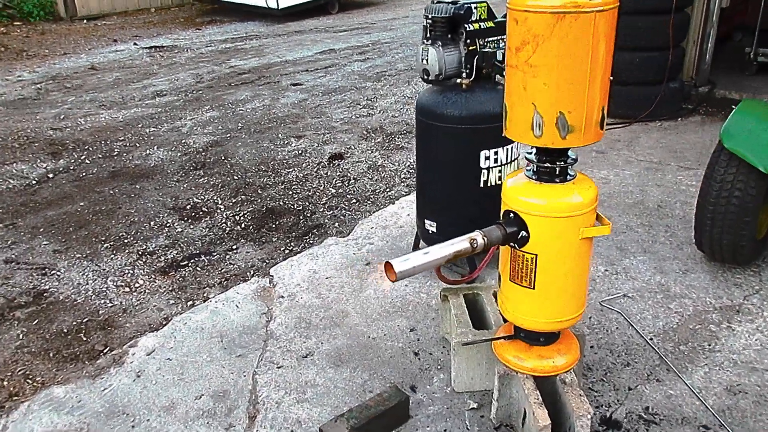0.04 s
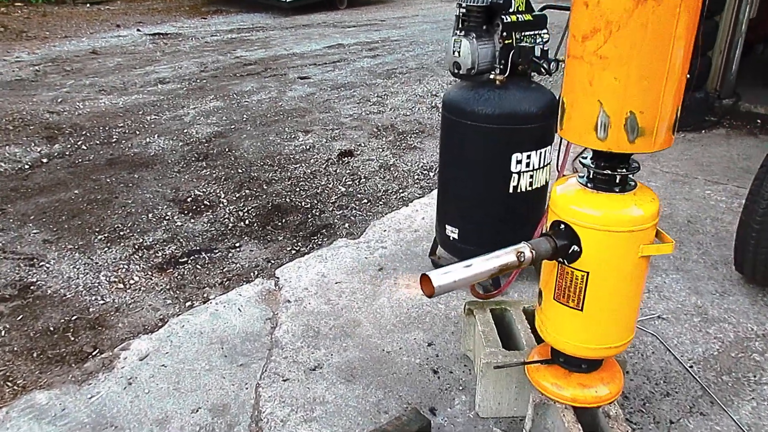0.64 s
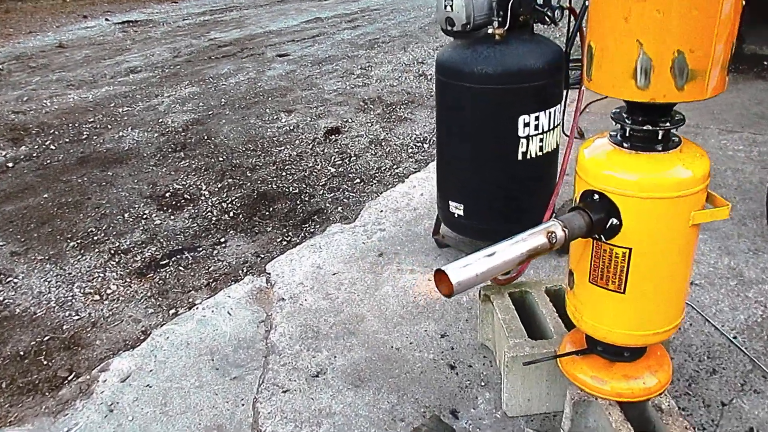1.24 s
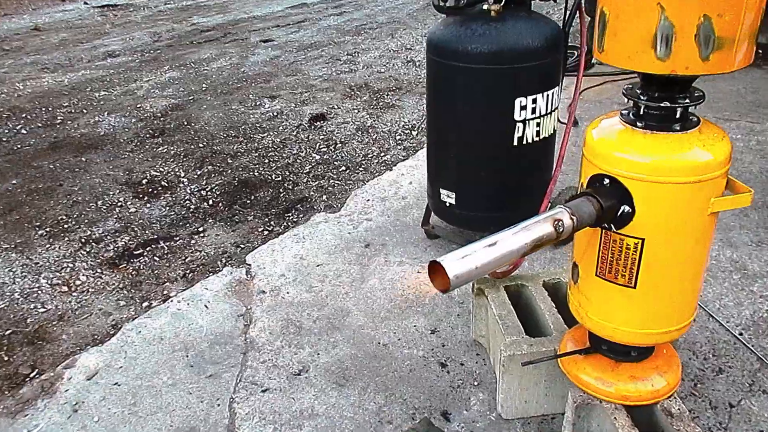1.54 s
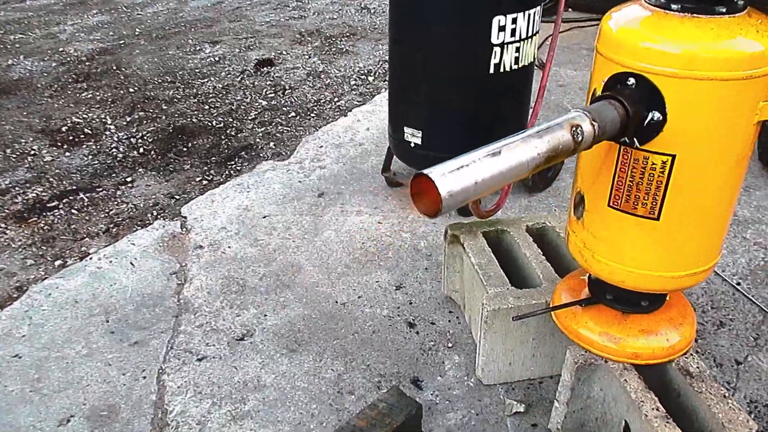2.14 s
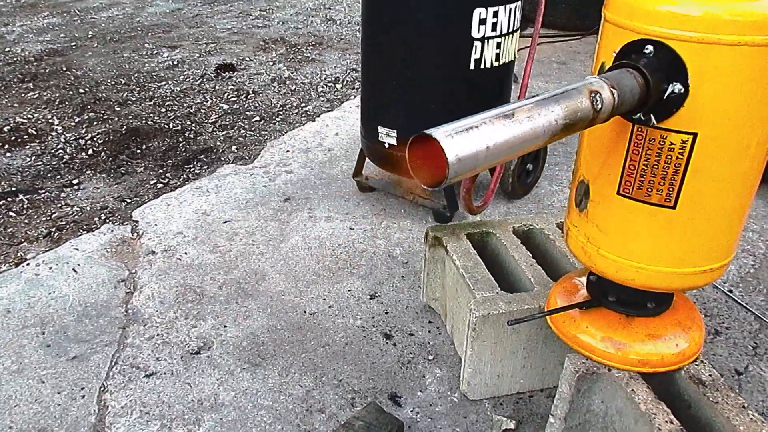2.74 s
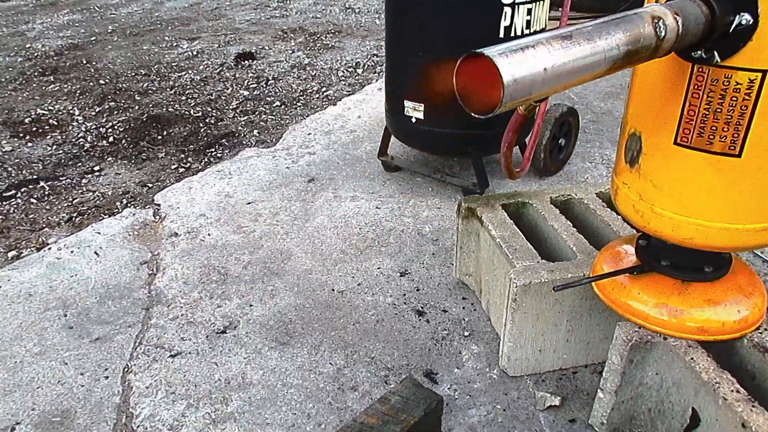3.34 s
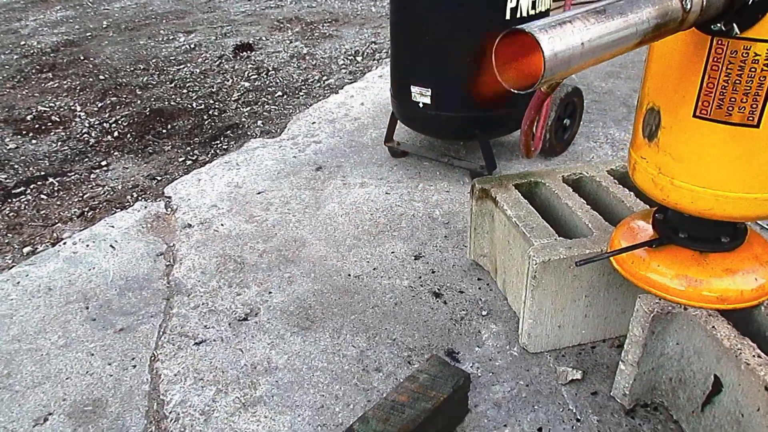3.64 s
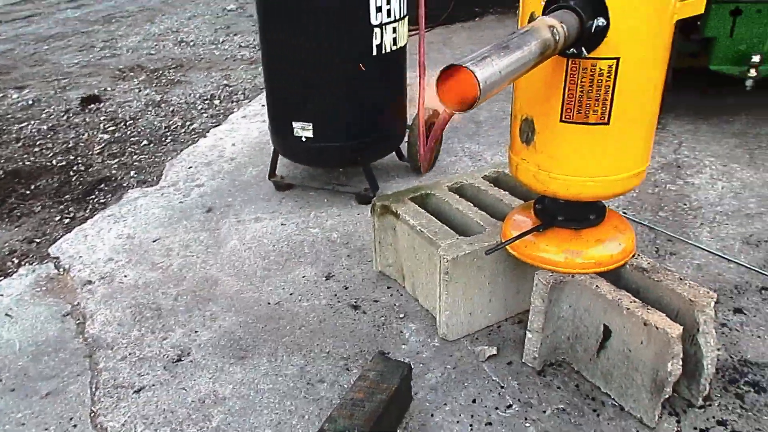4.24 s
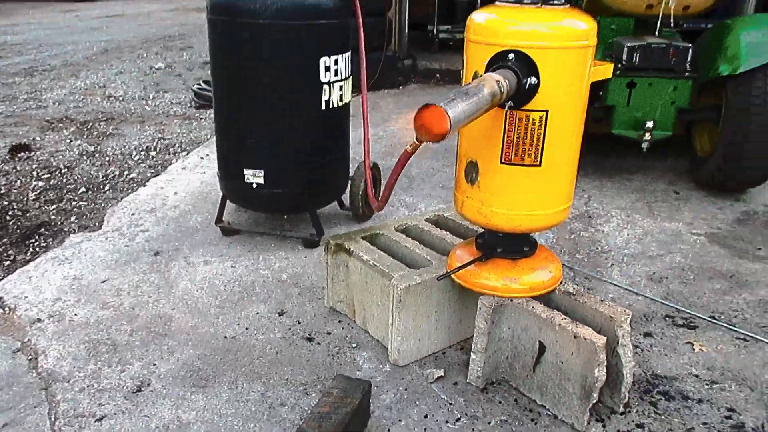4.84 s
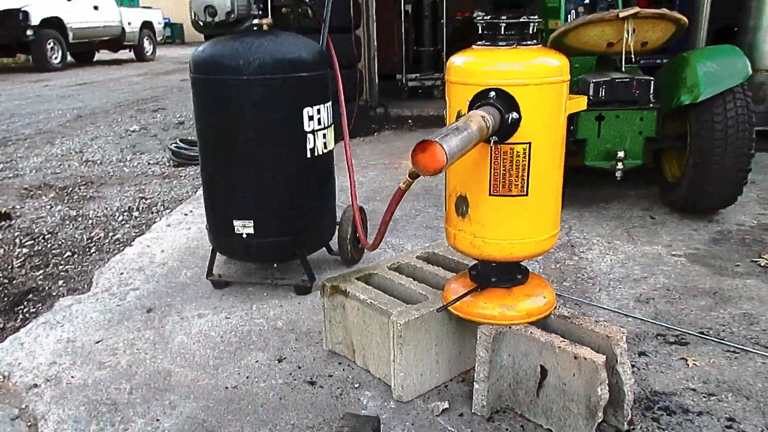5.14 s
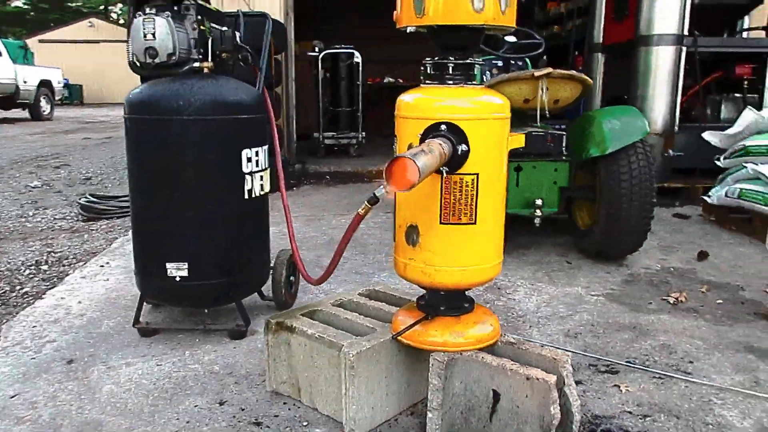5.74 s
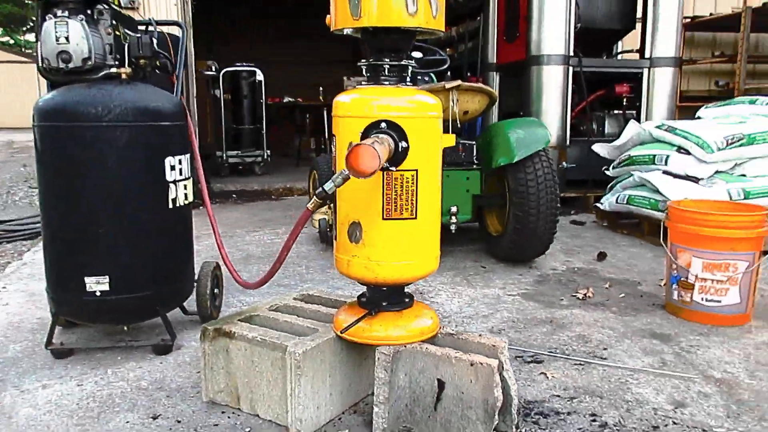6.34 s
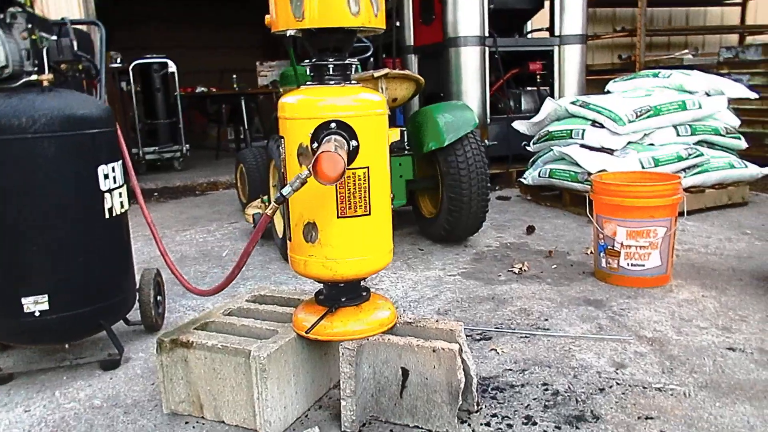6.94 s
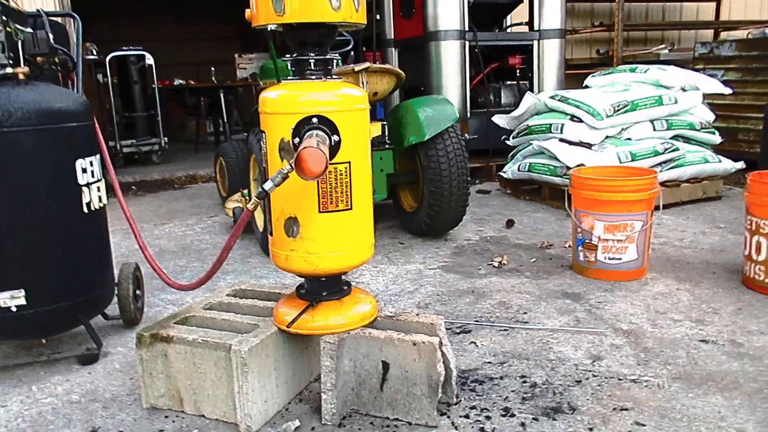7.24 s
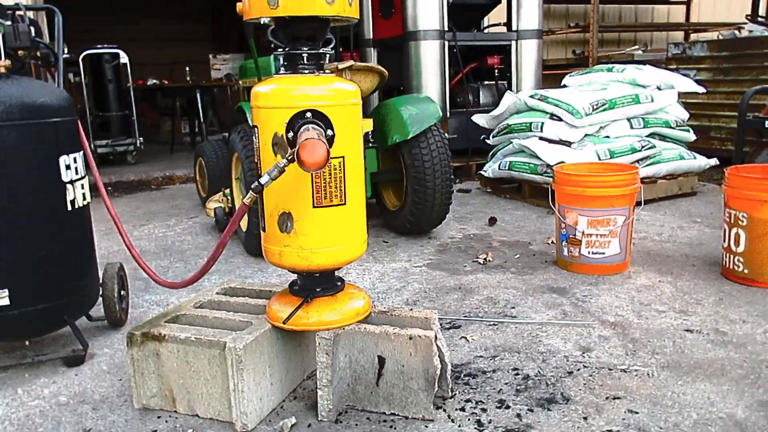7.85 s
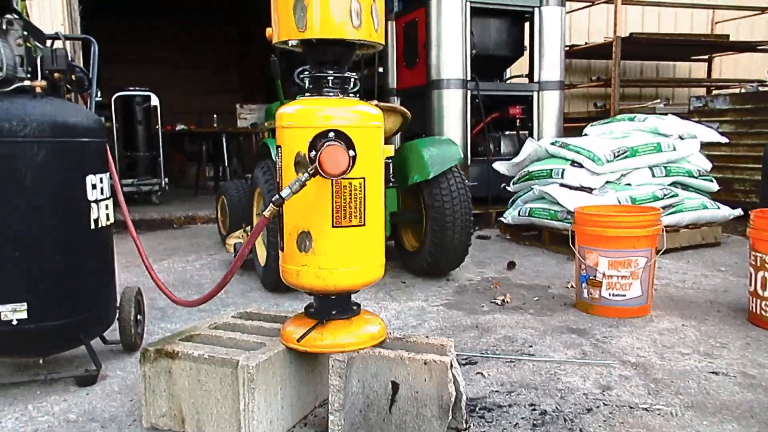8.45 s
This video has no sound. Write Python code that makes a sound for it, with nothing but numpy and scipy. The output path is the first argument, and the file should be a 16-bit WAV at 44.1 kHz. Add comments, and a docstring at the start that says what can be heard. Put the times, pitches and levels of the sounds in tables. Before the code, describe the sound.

Outdoors, a gas flame roars continuously from a steel pipe, with a hollow, fluttering ring. Beside it an air compressor runs with a very fast metallic clatter, a high ringing and hiss. Midway the microphone moves round to the pipe's mouth: the hollow tone fades into a louder roar, and the compressor's rattle, hum and thin whine come forward. Light wind rumbles on the microphone, with a soft thump near the end.

```python
"""Outdoors, a gasifier's flame roars and rings its steel flare pipe while an air compressor hammers
beside it, each piston stroke snapping the valves and ringing the pump head. Light wind touches the mic.
From 3.5 to 6.3 s the mic walks round to the pipe's mouth: the lowest pipe resonance sinks into the
roar, and the compressor's clatter and hum come forward. The roar peaks around 7 s and eases as the
mic backs away; a gust thumps it just after 8 s."""
import sys
import numpy as np
from scipy import signal
from scipy.fft import rfft, irfft, next_fast_len
from scipy.io import wavfile
from scipy.ndimage import uniform_filter1d, map_coordinates

SR = 44100
rng = np.random.default_rng(int(sys.argv[2]) if len(sys.argv) > 2 else 0)


def generate_wav(sig):
    """Save sig (samples, or channels by samples) to the path in sys.argv[1] as 16-bit PCM at SR."""
    pcm = np.round(np.clip(np.atleast_2d(sig).T, -1, 1) * 32767).astype(np.int16)
    wavfile.write(sys.argv[1], SR, pcm)


N = 383669

# flame faders: t/s, roar level/dB, upper resonance level/dB
FLAME_FADERS = [(0.0, -29.0, -36.0), (1.15, -29.5, -38.5), (2.3, -26, -32.0), (2.6, -27.5, -35),
                (3.65, -24.5, -33.5), (4.4, -28, -34.5), (5.4, -25, -31), (6.15, -24, -35.5),
                (6.45, -20.5, -30.5), (7.0, -20.5, -29.5), (7.4, -23, -29.0), (7.9, -22, -31.5),
                (8.4, -22, -33.5), (8.7, -24, -40)]
# brief flares (+) and falters (-): t/s, length/s, gain/dB
FLAME_SURGES = [(.14, 0.046, 2), (.72, .06, -8), (1.0, 0.023, 6.5), (1.24, 0.056, -8), (1.69, .04, -3),
                (1.728, 0.021, 10), (2.18, .03, 5.5), (3.68, 0.026, 7), (3.95, 0.036, 3.5),
                (4.18, 0.056, -5), (4.235, .03, 5.5), (4.55, 0.053, 6.5), (6.41, 0.034, 5.5),
                (7.0, 0.028, 3)]
# roar EQ beside the pipe: f/Hz, level/dB
ROAR_SIDE_EQ = [(30, -21), (100, -18.5), (200, -8), (330, 0.5), (480, -0.5), (620, 0.5), (800, -17.5),
                (950, -14), (1400, -11.5), (1700, -14.5), (4000, -23.5), (9000, -27)]
# roar EQ facing its mouth: f/Hz, level/dB
ROAR_FRONT_EQ = [(30, -42), (100, -18), (220, -11), (350, -5.5), (520, 4.5), (620, -0.5), (760, -5.5),
                 (880, -8), (1100, -17.5), (1380, -11.5), (1700, -17), (4000, -19.5), (9000, -34)]

def flame(front):
    """Turbulent burning roars broadly and drives two resonances of the flare pipe."""
    level_db, upper_db = curves(FLAME_FADERS)
    surge_db = bumps(FLAME_SURGES)
    side = np.sqrt(1 - front) * coloured(noise(), ROAR_SIDE_EQ)
    mouth = np.sqrt(front) * coloured(noise(), ROAR_FRONT_EQ)
    roar_db = level_db + 1.78 + (front - 0.07) * surge_db + 0.42 * wobble(8)
    roar = amp(roar_db) * steady(side + mouth, seconds=0.094)
    # the lower resonance stands out beside the pipe and sinks into the roar in front
    lower_db = level_db + 7 - 14 * front ** 2 + surge_db + 0.93 * wobble(14) + 1.47 * wobble(70)
    lower = steady(resonant(noise(), centre_hz=709.9, width_hz=94, order=3), seconds=0.05)
    upper_db += 1.5 + 1.5 * wobble(11)
    upper = steady(resonant(noise(), centre_hz=1250.4, width_hz=90, order=2), seconds=0.1)
    flicker = amp(0.9 * wobble(30))
    return flicker * (roar + amp(lower_db) * lower + amp(upper_db) * upper)


# compressor faders: t/s, stroke level/dB, hiss level/dB
COMPRESSOR_FADERS = [(0.0, -24.5, -33.5), (0.45, -25, -35.5), (0.75, -24.5, -34.5), (1.05, -25.5, -37.5),
                     (2.45, -25, -34.5), (2.8, -34, -41.5), (3.25, -29.5, -40), (3.8, -29.5, -38.0),
                     (4.03, -25, -35), (4.55, -28.0, -37), (4.8, -32, -38.5), (5.5, -30.5, -37),
                     (5.7, -26.5, -33.5), (6.2, -28.5, -29.5), (6.7, -28.0, -33.5), (7.07, -27.5, -29),
                     (7.9, -31.5, -35.5), (8.2, -27, -33.0), (8.7, -27, -33.5)]
# piston tempo: t/s, stroke rate/Hz
STROKE_RATE = [(0.0, 57.43), (0.58, 57.26), (1.16, 57.16), (1.74, 57.29), (2.32, 57.5), (2.9, 57.41),
               (3.48, 57.44), (4.06, 57.33), (4.64, 57.32), (5.22, 57.31), (5.8, 57.48), (6.38, 57.28),
               (6.96, 57.23), (7.54, 57.37), (8.12, 57.34), (8.7, 57.37)]
# the treble ducks briefly: t/s, length/s, depth on the valves/dB
TREBLE_DIPS = [(.58, .13, 6), (.955, .085, 5), (1.45, 0.079, 4.5), (1.9, 0.069, 6), (2.05, .09, 3.5),
               (2.307, .12, 7), (2.555, .06, 7), (4.305, .17, 2.5), (8.336, 0.11, 3.5)]
# fader of the pump head's ring: t/s, level/dB
RING_FADER = [(0.0, -27.5), (0.85, -29), (1.2, -35.5), (2.45, -27), (3.25, -29.5), (3.9, -33), (4.05, -19),
              (4.6, -25.5), (5.15, -31), (5.65, -34.5), (6.0, -22.5), (6.5, -30), (7.3, -27.5), (7.85, -34),
              (8.25, -26.5), (8.7, -29.5)]
# quick swells and drops of that ring: t/s, length/s, gain/dB
RING_RIDES = [(.25, 0.25, 2.5), (.8, .2, 3.5), (1.07, .07, 5.5), (1.33, .08, 5), (1.98, .12, 5.5),
              (2.43, .1, 3.5), (2.63, 0.064, 4), (2.87, .1, -13), (3.03, .07, -11), (4.82, .1, -17),
              (5.03, .08, -12), (6.5, .06, -7), (6.77, .07, -10)]

def compressor(front):
    """Each stroke snaps the valves, rings the head, rattles the casing and spits air, over a hum."""
    stroke_db, hiss_db = curves(COMPRESSOR_FADERS)
    dip_db = bumps(TREBLE_DIPS)
    waver_db = 0.7 * wobble(12)
    turns = np.cumsum(curves(STROKE_RATE)[0] + 0.05 * wobble(9)) / SR
    crank = turns - 0.345  # whole numbers where the valves snap
    snap = amp(stroke_db + 0.9 - dip_db + waver_db) * valves(crank, front)
    ring_db = curves(RING_FADER)[0] + 2.1 - 1.3 * dip_db + bumps(RING_RIDES) + 1.3 * wobble(11)
    ring = amp(ring_db) * head_ring(crank, front)
    clatter = amp(stroke_db - 1.6 + 5.5 * front - 0.85 * dip_db + waver_db) * casing(crank, front)
    hiss = amp(hiss_db + 0.7 - 0.59 * dip_db + waver_db + 0.52 * wobble(19)) * air_hiss(crank, front)
    return snap + ring + clatter + hiss + hum(turns, front)


# bright EQ of the valve snap: f/Hz, level/dB
SNAP_EQ = [(2000, -29), (4000, -27), (4800, 6), (5200, 6), (5350, 6), (6000, 3), (6800, 2), (7500, 0.5),
           (8500, -4), (9400, -6), (11000, -44)]
# valve plate modes: f/Hz, width/Hz, level against the snap/dB
PLATE_MODES = [(5940, 330, -23), (7970, 81, -16.5), (8490, 370, -15), (10040, 57, -23)]

def valves(crank, front):
    """The reed valve slaps its seat, air bursts through it, and the reed bounces once."""
    slap = np.diff(np.floor(crank), prepend=np.floor(crank[0])) * amp(1.1 * wobble(63))
    crack = burst(crank, start=0, rise=0.0055, fall=0.041, scatter_db=1.0)
    rush = burst(crank, start=0.01, rise=0.078, fall=0.21, scatter_db=0.5)
    bounce = burst(crank, start=0.18, rise=0.014, fall=0.095, scatter_db=2.5)
    direct = 1 - 0.89 * front  # from the front the sharp edge is lost and echoes fill the gaps
    envelope = 2 * direct * crack + 0.99 * rush + 0.46 * bounce + 0.12 + 0.16 * front
    drive = envelope * stroke_noise(crank, alike=0.26, drift_hz=2.52) - 5.2 * direct ** 2 * slap
    snap = echo_ripple(coloured(drive, SNAP_EQ), depth_db=1.5)
    return steady(snap + modal(drive, PLATE_MODES), seconds=0.14)


def head_ring(crank, front):
    """The pump head's sharp mode is struck anew on every stroke; two looser modes ring below it."""
    swell = unit(burst(crank, start=0.0058, rise=0.084, fall=0.39, scatter_db=3.0) + 0.28)
    ring_hz = 5046 + 8 * wobble(30)
    tone = np.sqrt(2) * swell * np.sin(2 * np.pi * np.cumsum(ring_hz) / SR)
    blows = burst(crank, start=0, rise=0.02, fall=0.14, scatter_db=1.5)
    blows *= stroke_noise(crank, alike=0.16, drift_hz=3.01)
    middle = amp(-9 + 8.6 * front) * resonant(blows, centre_hz=4996, width_hz=79, order=2)
    lower = amp(-15.5) * resonant(blows, centre_hz=4434, width_hz=130, order=2)
    return steady(tone + middle + lower, seconds=0.081)


# EQ of the casing's clatter: f/Hz, level/dB
CLATTER_EQ = [(600, -52), (1100, 0.5), (1500, -12), (1740, -4), (1950, -1.5), (2350, -2.5), (2630, -5.5),
              (3000, -2.5), (3800, 0.5), (4450, 1), (4800, 4.5), (5600, -7.5), (8000, -18)]
# casing modes: f/Hz, width/Hz, level against the clatter/dB
CASING_MODES = [(1722, 74, -18), (2615, 410, -12), (3475, 99, -17.5), (4410, 170, -13.5)]
# fader of one buzzing mode that radiates mostly to the front: t/s, level against the clatter/dB
BUZZ_FADER = [(0, -13), (1.5, -20), (4.5, -16), (5.4, -13), (6, -11), (7.9, -13), (8.55, -4), (8.7, -7)]

def casing(crank, front):
    """The piston's knock rattles the pump casing, much alike on every stroke."""
    knock = burst(crank, start=0, rise=0.0071, fall=0.04, scatter_db=1.5)
    shake = burst(crank, start=0.0092, rise=0.054, fall=0.41, scatter_db=0)
    bounce = burst(crank, start=0.21, rise=0.014, fall=0.22, scatter_db=2)
    envelope = 0.7 * knock + 0.74 * shake + 0.26 * bounce + 0.24 + 0.035 * front
    rattle = envelope * stroke_noise(crank, alike=0.52, drift_hz=1.22)
    buzz = amp(curves(BUZZ_FADER)[0]) * resonant(rattle, centre_hz=2623, width_hz=220, order=2)
    clatter = echo_ripple(coloured(rattle, CLATTER_EQ), depth_db=1.54)
    return steady(clatter + modal(rattle, CASING_MODES) + buzz, seconds=0.15)


# airy top end of the pump: f/Hz, level/dB
HISS_EQ = [(7000, -12), (9400, -9), (10100, 1.5), (10600, 1.5), (11800, -4.5), (12400, -8), (13000, 6),
           (13600, -3), (14500, -6), (15000, -9)]

def air_hiss(crank, front):
    """Air hisses through the pump on each stroke, after a short, very high spit at the intake."""
    envelope = burst(crank, start=0, rise=0.035, fall=0.38, scatter_db=0.6) + 0.1 + 0.093 * front
    flow = envelope * stroke_noise(crank, alike=0.25, drift_hz=2.47)
    hiss = echo_ripple(coloured(flow, HISS_EQ), depth_db=2.5)
    intake = burst(crank, start=-0.25, rise=0.015, fall=0.21, scatter_db=1.5) * noise()
    spit = amp(-10.5) * resonant(intake, centre_hz=13000, width_hz=6000, order=2)
    return steady(hiss + spit, seconds=0.1)


# motor and pump partials: multiple of the stroke rate, level/dB
HUM_PARTIALS = [(1, -54.5), (2, -53), (4, -48), (6, -40), (7, -48), (8, -41), (15, -52.5), (16, -41.5),
                (18, -47), (19, -47), (20, -58), (30, -48.5), (37, -47), (45, -50), (46, -47), (47, -45),
                (54, -49)]
# fader of the whining partial: t/s, level/dB
WHINE_FADER = [(0, -44), (2.8, -48), (3.6, -38), (4.0, -43), (5.6, -36), (8.7, -36)]

def hum(turns, front):
    """Motor and pump hum at harmonics of the stroke rate, louder from the front; the 17th whines."""
    drone = sum(amp(db + 1.4 * wobble(1.4)) * np.sin(2 * np.pi * (order * turns + rng.random()))
                for order, db in HUM_PARTIALS)
    whine = amp(curves(WHINE_FADER)[0] + 1.1 * wobble(3)) * np.sin(2 * np.pi * 17 * turns)
    return amp(-0.5 + 5.9 * front) * drone + whine


# wind fader: t/s, level/dB
WIND_FADER = [(0.0, -39), (0.22, -33), (0.6, -41.5), (1.7, -51), (2.4, -37.0), (2.7, -44), (3.9, -40),
              (4.4, -47.5), (6.8, -36.5), (7.9, -43), (8.25, -31.0), (8.7, -30)]
# low-end EQ of the buffeting: f/Hz, level/dB
RUMBLE_EQ = [(10, -32), (30, -16), (55, -2.5), (100, 6), (160, 7.5), (260, 0.5), (600, -42)]
# soft hits of air: t/s, level/dB
WIND_THUMPS = [(.17, -34), (2.18, -36), (2.44, -32), (8.2, -24)]

def wind():
    """Moving air rumbles on the microphone in uneven gusts, with a few soft thumps."""
    gusts = amp(curves(WIND_FADER)[0] + 0.6 + 1.8 * wobble(9))
    rumble = steady(coloured(noise(), RUMBLE_EQ), seconds=0.29)
    thumps = sum(amp(db) * bump(t, length_s=0.034) for t, db in WIND_THUMPS)
    boom = steady(resonant(noise(), centre_hz=78, width_hz=90, order=2), seconds=0.05)
    return gusts * rumble + thumps * boom


def burst(turns, start, rise, fall, scatter_db):
    """One envelope a stroke, each of its own size; start, rise and fall are in crank turns."""
    stroke, age = np.divmod(turns - start + 2, 1)
    sizes = amp(scatter_db * rng.standard_normal(int(stroke[-1]) + 1))
    return sizes[stroke.astype(int)] * (1 - np.exp(-age / rise)) * np.exp(-age / fall)


def stroke_noise(turns, alike, drift_hz):
    """Noise whose share `alike` loops on every stroke; the loop drifts as the echo paths change."""
    period = round(N / (turns[-1] - turns[0]))
    place = (turns % 1 * period).astype(int)
    loop = unit(sum(wobble(drift_hz) * rng.standard_normal(period)[place] for _ in range(4)))
    return np.sqrt(alike) * loop + np.sqrt(1 - alike) * noise()


def echo_ripple(x, depth_db):
    """A drifting random EQ: ground and wall echoes add and cancel as the microphone moves."""
    spectrum = signal.stft(x, nperseg=512)[2]
    ripple = rng.standard_normal(spectrum.shape)
    for axis, span in ((0, 7), (1, 30), (1, 30)):  # smooth over frequency, then twice over time
        ripple = uniform_filter1d(ripple, span, axis)
    return unit(signal.istft(spectrum * amp(depth_db * unit(ripple)), nperseg=512)[1][:N])


def modal(x, modes):
    """The sum of the modes that x excites."""
    return sum(amp(db) * resonant(x, hz, width) for hz, width, db in modes)


def resonant(x, centre_hz, width_hz, order=1):
    """x through `order` identical band-passes in series, at rms 1."""
    def band_pass(f):
        return 1j * f * width_hz / (centre_hz ** 2 - f * f + 1j * f * width_hz)
    return unit(filtered(x, lambda f: band_pass(f) ** order))


def coloured(x, eq):
    """x through an EQ of (f/Hz, level/dB) points, at rms 1."""
    f, db = np.transpose(eq)
    return unit(filtered(x, lambda hz: amp(np.interp(np.log(hz + 1), np.log(f), db, left=-80, right=-80))))


def filtered(x, response):
    """x times a complex response of frequency."""
    size = next_fast_len(N + SR // 2)
    return irfft(rfft(x, size) * response(np.fft.rfftfreq(size, 1 / SR)), size)[:N]


def steady(x, seconds):
    """A leveller: slow swells are evened out to rms 1; the fast flutter stays."""
    window = int(seconds * SR)
    power = uniform_filter1d(uniform_filter1d(x ** 2, window), window)
    return unit(x / np.sqrt(np.abs(power) + 1e-6))


def curves(rows):
    """Automation lanes: one value per sample for each column after the time."""
    t, *columns = np.transpose(rows)
    return [np.interp(np.arange(N) / SR, t, column) for column in columns]


def wobble(rate):
    """A smooth random curve, rate knots a second."""
    return map_coordinates(rng.standard_normal(int(N * rate / SR) + 4), [np.arange(N) * rate / SR])


def bump(t, length_s):
    """A smooth bump of height 1 around time t."""
    return np.exp(-(2 * (np.arange(N) / SR - t) / length_s) ** 2)


def bumps(rows):
    """The sum of (t/s, length/s, gain/dB) bumps."""
    return sum(db * bump(t, length) for t, length, db in rows)


def noise():
    return rng.standard_normal(N)


def amp(db):
    return 10 ** (np.asarray(db) / 20)


def unit(x):
    return x / np.sqrt(np.mean(x ** 2) + 1e-20)


# the mic's walk round the pipe: t/s, position (0 beside it, 1 facing its mouth)
MIC_WALK = [(0, 0), (3.5, 0), (5.2, 0.51), (6.3, 1), (8.7, 0.96)]

def scene():
    """Flame, compressor and wind, mixed in mono at the walking microphone."""
    front = curves(MIC_WALK)[0]
    return (flame(front) + compressor(front) + wind())[None]


def record(dry):
    """A brick-wall low-pass trims the very top of the mix."""
    return filtered(dry[0], lambda hz: hz < 15080)[None]


dry = scene()
out = record(dry)
generate_wav(out)
```